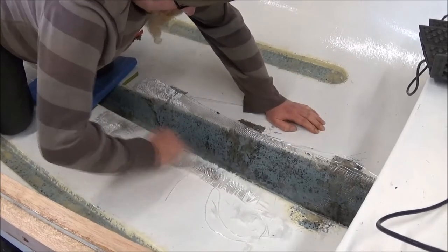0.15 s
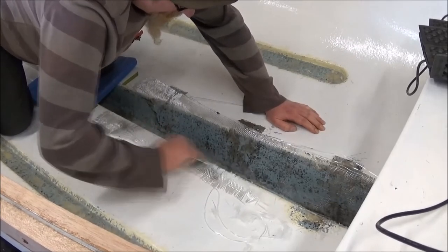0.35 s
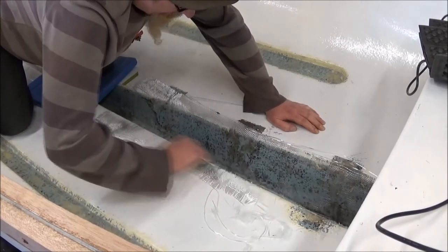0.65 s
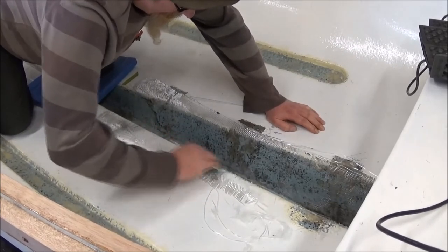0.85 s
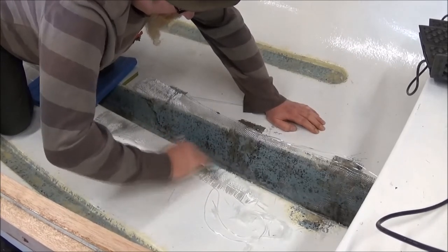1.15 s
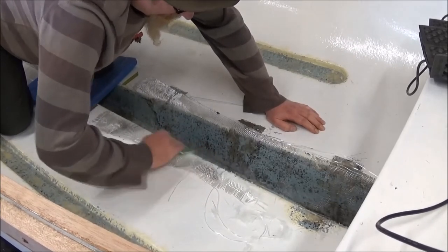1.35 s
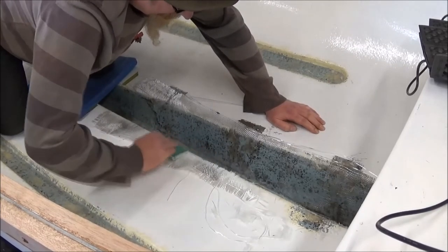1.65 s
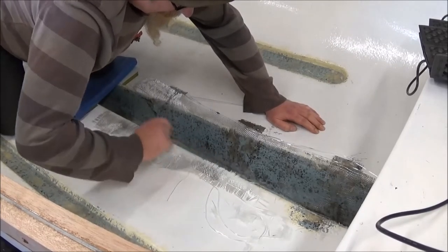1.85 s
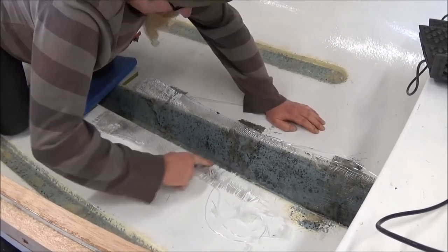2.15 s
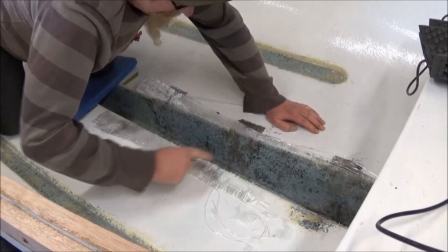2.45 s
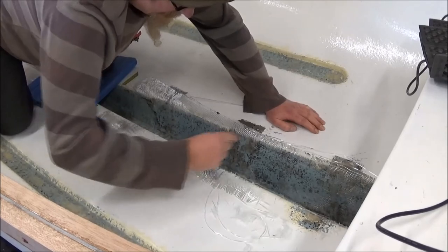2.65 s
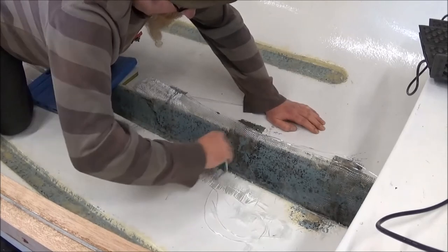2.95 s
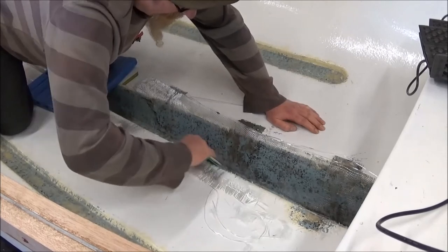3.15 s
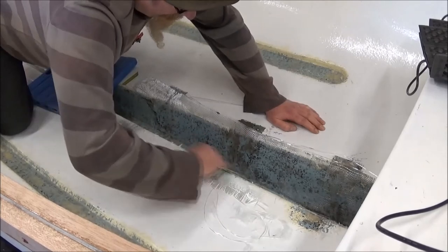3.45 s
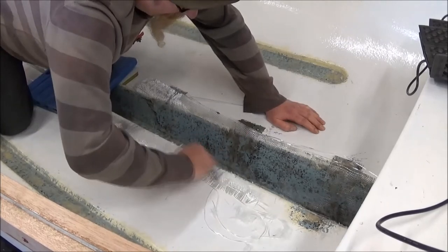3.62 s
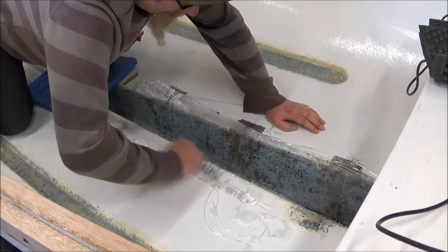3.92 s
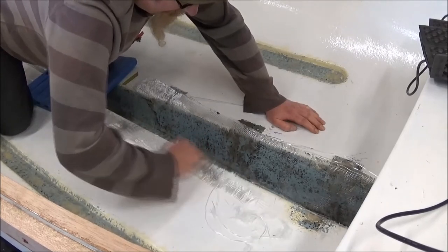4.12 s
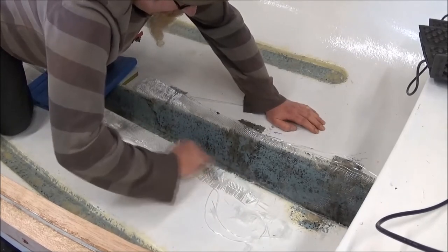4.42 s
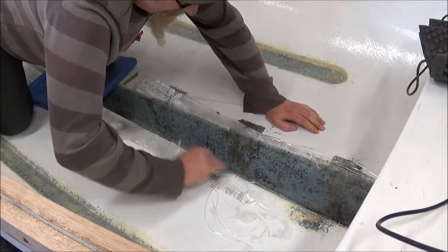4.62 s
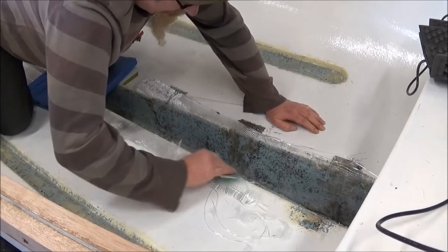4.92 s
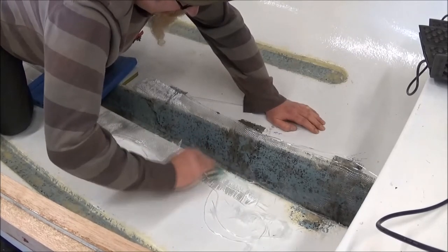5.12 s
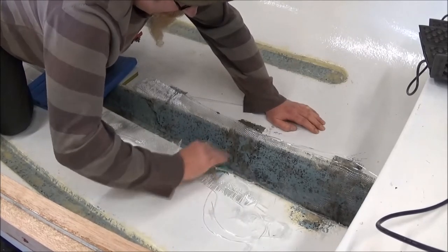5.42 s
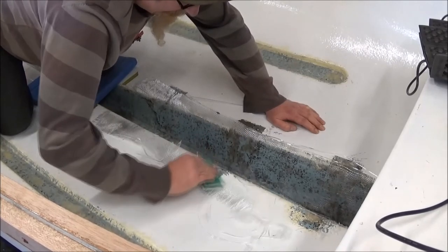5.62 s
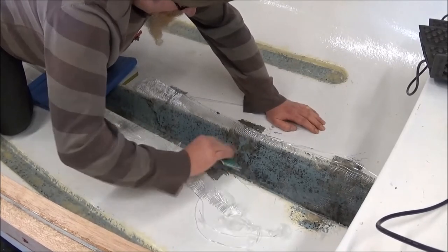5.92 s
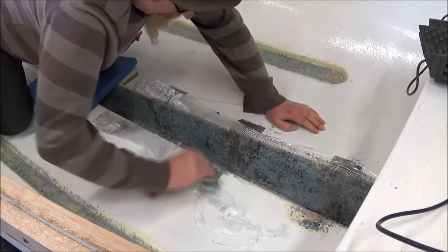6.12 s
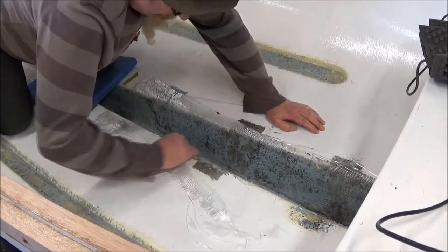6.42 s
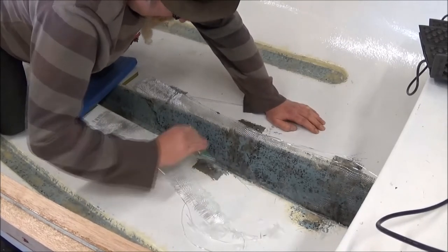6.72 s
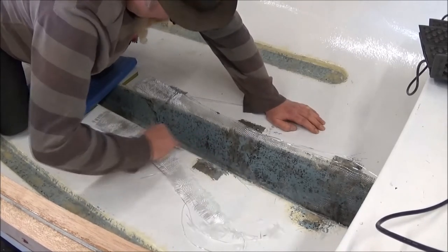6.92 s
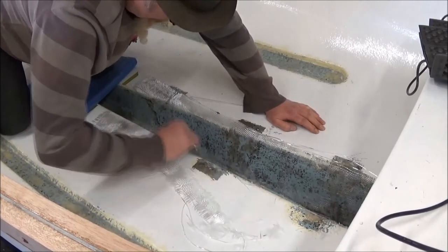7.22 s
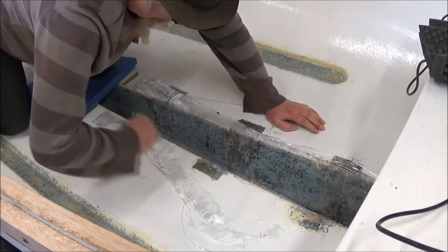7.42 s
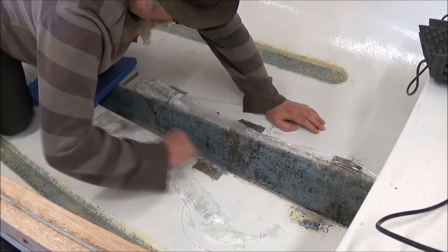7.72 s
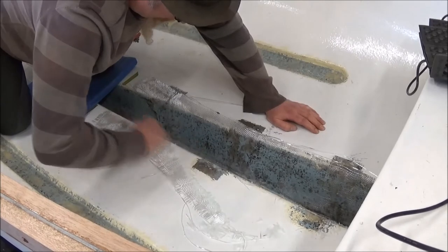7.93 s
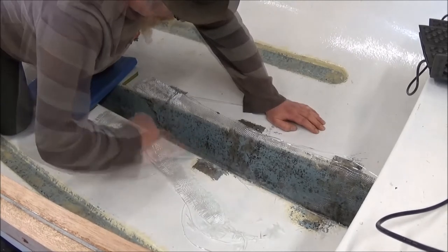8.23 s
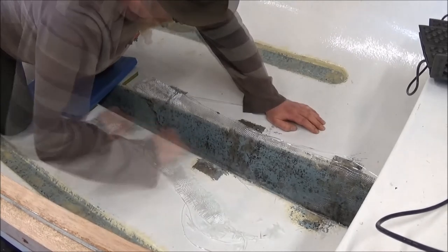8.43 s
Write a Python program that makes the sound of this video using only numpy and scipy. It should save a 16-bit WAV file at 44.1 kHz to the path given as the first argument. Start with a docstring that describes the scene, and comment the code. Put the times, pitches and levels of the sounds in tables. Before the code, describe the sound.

Close and centred in a workshop, a hand sanding block scrubs resin inside a fibreglass hull in rapid, hissing strokes. After a short lull with gentle wiping, crisp paper snaps and a dull bump, the scrubbing returns. Later the strokes become spaced out, the block landing with light thuds, before a last run of quieter rubs. Short room reflections and a faint ventilation hum lie behind the work.

```python
"""A sanding block, pushed back and forth by hand over hard resin inside a fibreglass boat hull.
Each stroke is a hiss of grit that also rattles the block and drums the hull panel. In a pause hand or
paper wipes lightly, the paper is flicked about and the hull takes a knock; later the block is lifted
and set down between strokes. Workshop reflections and quiet ventilation give the width."""
import sys
import numpy as np
from scipy import signal
from scipy.fft import rfft, irfft, next_fast_len
from scipy.io import wavfile
from scipy.ndimage import uniform_filter1d, map_coordinates

SR = 44100
rng = np.random.default_rng(int(sys.argv[2]) if len(sys.argv) > 2 else 0)


def to_wav(s):
    """Save 16-bit WAV."""
    ch = np.atleast_2d(s).T  # columns
    pcm = np.round(np.clip(ch, -1, 1) * 32767)  # PCM
    wavfile.write(sys.argv[1], SR, pcm.astype(np.int16))


N = 377937

# Workshop air. Each row: frequency in Hz, relative spectral level in dB.
AIR_SPECTRUM = [(20, -4), (60, 3), (130, 3.5), (210, 3.5), (320, -4.5), (700, -3.5), (1100, -4.5),
                (1400, -7), (1680, -4.5), (2050, -10.5), (5000, -18), (9500, -16.5), (15500, -30)]
# Background swell. Each row: time in seconds, gain in dB.
AIR_GAIN = [(0, 3), (1.5, 7.5), (2.3, 1.5), (3.5, 8.5), (5.9, 3), (7.3, -3.5), (8.57, -4.5)]
# Workshop reverberation. Each row: frequency in Hz, T60 in seconds.
ROOM_T60 = [(100, 0.28), (400, 0.35), (1500, 0.31), (4000, 0.32), (9000, 0.23), (15000, 0.16)]
# Stereo width. Each row: frequency in Hz, side gain in dB.
SIDE_GAIN = [(50, -29), (130, -23.5), (250, -16), (500, -10.5), (1100, -6), (2500, -7), (8000, -5),
             (9500, -9.5), (11000, -15), (13000, -39)]
# Hull panel resonances. Each row: frequency in Hz, bandwidth in Hz, relative level in dB.
HULL_MODES = [(60, 8.3, -13), (98.4, 3.9, -2), (165, 37, -10.5), (203.4, 17.4, 2), (227, 22, 1),
              (272, 35, 1), (326.5, 64, 1), (378.6, 84, 2.5), (461, 135, -5), (535.8, 23, 1),
              (638, 185, -10.5)]
# Block resonances. Each row: frequency in Hz, bandwidth in Hz, relative level in dB.
BLOCK_MODES = [(824, 290, 0.21), (1072, 64, 18.7), (1167, 82, 14.4), (1335, 88, 20.3), (1515, 96, 12.5),
               (1678, 80, 19.8), (2030, 580, 0.86), (2710, 92, 1.4)]
# A knee or the block lands on the hull, or the block judders. Each row: start in seconds,
# level in dB, judder decay in seconds, hardness in Hz, ringing share from 0 to 1.
HULL_THUMPS = [(0.35, -34.5, 0.026, 326, 0.8), (1.03, -41.5, 0.022, 115, 1), (1.15, -36, 0.017, 300, 0.78),
               (2.062, -43, 0.0066, 140, 0.1), (2.073, -39, 0.0072, 239, 0.63),
               (2.1, -38.5, 0.0057, 96, 0.8), (2.952, -52, 0.02, 218, 0.6), (5.465, -38.5, 0.022, 75, 0.16),
               (6.042, -35, 0.02, 85.5, .08), (6.411, -36, 0.039, 240, 0.26), (6.898, -51, 0.014, 190, 0.3),
               (7.286, -42, 0.018, 230, 0.15), (7.29, -47.5, 0.014, 62, 0.05),
               (7.683, -50, 0.025, 213, 0.4)]
# Stiff paper snaps, scuffs or touches down. Each row: time in seconds, level in dB, decay in seconds.
PAPER_FLICKS = [(0.954, -27, 0.0049), (1.782, -31, 0.0057), (1.881, -35, 0.021), (2.064, -41, 0.027),
                (2.234, -41.5, 0.012), (2.692, -46, 0.01), (2.755, -35.5, 0.016), (2.829, -34.5, 0.0061),
                (2.9, -33.5, 0.013), (3.036, -34.5, 0.011), (4.987, -38, 0.012), (5.418, -45, 0.039),
                (5.471, -44, 0.0035), (5.488, -42, 0.007), (5.872, -47.5, 0.014), (6.02, -44, 0.015),
                (6.035, -35, 0.016), (6.39, -37, 0.012), (6.408, -28.5, 0.025), (6.887, -36, 0.012),
                (6.9, -27.5, 0.015), (7.282, -41, 0.015), (7.298, -28.5, 0.016), (7.68, -34, 0.025)]
# Grit hiss. Each row: frequency in Hz, relative spectral level in dB.
HISS_SPECTRUM = [(1000, 1.5), (3500, -8), (4500, -7), (5400, -4), (7200, -2.5), (8400, 0), (9400, 4.5),
                 (10100, 2), (11000, -1), (12200, -5.5), (13500, -10.5), (15800, -16)]
# Gap under the paper as the grip shifts. Each row: time in seconds, lower hiss edge in Hz, rasp in Hz.
PAPER_GAP = [(0, 3030, 4140), (.7, 3000, 4050), (1.1, 2930, 3400), (1.4, 2780, 4000), (2.5, 2850, 3400),
             (3.25, 3100, 4760), (3.42, 3150, 4420), (3.77, 2980, 3430), (4.22, 2770, 3550),
             (4.4, 2580, 2960), (4.95, 2700, 5600), (6.05, 2820, 5530), (6.42, 2870, 3370),
             (7.27, 2800, 4160), (7.7, 3000, 4300), (7.9, 2940, 4250), (8.5, 2650, 3600)]
# Slacker spots of the hull sound deeper. Each row: time in seconds, bass tilt in dB per octave.
HULL_SLACK = [(0, 1), (.8, -1.5), (1.5, 0.5), (3.1, -0.5), (3.8, 2.5), (5.2, 2), (6.5, -2.5), (7.6, -0.5),
              (8.5, 1)]
# Hull drumming, highest while the paper barely bites. Each row: time in seconds, gain in dB.
DRUM_GAIN = [(0, 0), (.63, -1.5), (1.1, 5), (1.53, -3), (1.7, 7.5), (2.2, 10), (2.68, 0), (2.9, 16),
             (3.1, -5), (4.3, 0), (5.1, 1.5), (5.45, 9.5), (5.6, -4.5), (6.9, -5), (7.7, -5), (8.5, -2)]
# Block scrape. Each row: time in seconds, gain in dB.
SCRAPE_GAIN = [(0, -0.5), (1.1, 2.5), (1.53, -1), (1.7, 8.5), (2.2, 13.5), (2.68, -16), (2.9, 4), (3.25, 1),
               (3.8, -1.5), (4.4, -3), (5, -0.5), (5.5, 2.5), (6.9, 3), (7.7, 1), (8.5, 0.5)]
# Sanding strokes, forth or back, and light wipes of hand or paper in the pause.
# Each row: start in seconds, end in seconds, hiss level in dB, pressure change over the rub in dB,
# brightness in dB per octave.
RUBS = [(-0.036, 0.126, -24, -17.5, -1.3), (0.092, 0.311, -23.5, 5.5, -1.5), (0.283, 0.46, -23, 0.5, -1.5),
        (0.458, 0.636, -23.5, -5.5, -1.7), (0.626, 0.795, -22, -1.0, -0.9), (0.766, 0.96, -23.5, -3, -0.8),
        (0.939, 1.1, -23.5, 2, -1), (1.085, 1.256, -24, -6, 0.8), (1.239, 1.394, -23.5, 7, -0.5),
        (1.383, 1.534, -23.5, 1, 0.8), (1.54, 1.688, -23.5, 7.5, 0.6), (1.664, 1.867, -34.5, -3.5, -2.3),
        (1.845, 2.06, -49, -11, 0.5), (2.16, 2.437, -48.0, -2, 0.7), (2.446, 2.527, -56.5, -20, 0),
        (2.506, 2.584, -43.5, 0, -0.5), (2.679, 2.744, -38.5, 15, -1), (2.905, 3.04, -45, -6, 0.5),
        (3.016, 3.137, -37, 3, -2.5), (3.096, 3.267, -25.5, -9, 0.5), (3.254, 3.439, -25, -11.5, -2.8),
        (3.415, 3.609, -24, -3.5, -2.8), (3.605, 3.767, -25, 4, -4), (3.77, 3.939, -23, -0.5, -2.2),
        (3.933, 4.081, -23.5, 10, -3.5), (4.079, 4.243, -23.5, 1.0, -3.5), (4.227, 4.384, -23.5, -2, -4.5),
        (4.38, 4.52, -24.5, -1.5, -4), (4.51, 4.644, -25, 0, -2.5), (4.634, 4.762, -24, -0.5, -1.3),
        (4.76, 4.926, -25, -2, -1), (4.963, 5.104, -28.5, 19, -1.1), (5.106, 5.282, -26, 0, -0.5),
        (5.448, 5.622, -33.5, 7.5, -4.5), (5.582, 5.722, -27.5, 9.0, -3), (6.044, 6.256, -26.5, -1, -3.0),
        (6.419, 6.602, -29.5, 13.5, -4), (6.865, 7.123, -30, 6, 0.4), (7.267, 7.528, -31, 3.5, -0.5),
        (7.484, 7.581, -38, -12, 0.2), (7.701, 7.95, -33, -1, -0.7), (7.898, 8.12, -35, -5, 0.5),
        (8.082, 8.285, -35, -1, -0.2), (8.254, 8.457, -36.5, -1.5, -1), (8.398, 8.642, -37, 5.5, 0.5)]


def amp(db):
    """dB to gain."""
    return 10 ** (np.asarray(db) / 20)


def unit_rms(x):
    """Scale to rms 1."""
    return x / np.sqrt(np.mean(x ** 2) + 1e-20)


def at_hz(table, hz):
    """Interpolate a table over log frequency."""
    f, value = np.transpose(table)
    return np.interp(np.log(hz + 1), np.log(f + 1), value)


def at_time(table, time_s):
    """Interpolate each value column over time."""
    times, *columns = np.transpose(table)
    return [np.interp(time_s, times, column) for column in columns]


def add(mix, start_s, sound):
    """Mix in at start_s, cutting any overhang."""
    at = round(start_s * SR)
    sound = sound[max(-at, 0):]
    part = mix[max(at, 0):][:len(sound)]
    part += sound[:len(part)]


def colour(x, gain):
    """Filter by gain(frequency in Hz)."""
    size = next_fast_len(x.shape[-1] + 2048)
    return irfft(rfft(x, size) * gain(np.fft.rfftfreq(size, 1 / SR)), size)[..., :x.shape[-1]]


def wander(size, rate_hz):
    """Random drift of rms 1, rolling off above rate_hz."""
    return unit_rms(colour(rng.standard_normal(size), lambda f: 1 / (1 + (f / rate_hz) ** 2)))


def ring(force, modes, detune, spot_db):
    """Damped modes of alternating sign; each contact spot loads and feeds them differently."""
    t = np.arange(SR // 4) / SR
    spots = rng.standard_normal((len(modes), 2))
    response = np.zeros(len(t))
    for k, ((hz, width_hz, db), (feed, load)) in enumerate(zip(modes, spots)):
        envelope = amp(db + spot_db * feed) * width_hz * np.exp(-np.pi * width_hz * t)
        response += (-1) ** k * envelope * np.cos(2 * np.pi * hz * (1 + detune * load) * t)
    return signal.fftconvolve(force, response / np.linalg.norm(response))


def ventilation(air_db=-58.5, hum_hz=198.7, hum_db=-66.5, waver_db=2):
    """Quiet air rumble with a wavering hum, as mid and side."""
    noise = colour(rng.standard_normal((2, N)), lambda f: amp(at_hz(AIR_SPECTRUM, f)))
    mid, side = amp(air_db) * unit_rms(noise)
    pitch_hz = hum_hz + 2.29 * wander(N, rate_hz=4.9)
    hum = np.sqrt(2) * np.sin(2 * np.pi * np.cumsum(pitch_hz) / SR)
    hum *= amp(hum_db + waver_db * wander(N, rate_hz=4))
    swell = amp(at_time(AIR_GAIN, np.arange(N) / SR)[0])
    return swell * np.array([mid + hum, side])


def room(x, first_s=0.0049, build_s=0.019):
    """Dense reflections off hull and walls, as mid and side; each band has its own decay."""
    hz, t, noise = signal.stft(rng.standard_normal((2, SR)), SR, nperseg=256)
    tail = signal.istft(noise * amp(-60 * t / at_hz(ROOM_T60, hz)[:, None]), SR)[1]
    tail *= 1 - np.exp(-np.maximum(np.arange(tail.shape[1]) / SR - first_s, 0) / build_s)
    return signal.fftconvolve(x[None], tail / np.linalg.norm(tail[0]), axes=1)[:, :N]


def moving_room(x, count=3, cycles_per_s=1.3):
    """The moving hand and arm change the reflections: a crossfade of room responses."""
    place = np.arange(N) / SR * cycles_per_s * count
    nearness = [np.maximum(1 - abs((place - k) % count - count / 2), 0) for k in range(count)]
    return sum(room(x * np.sin(np.pi / 2 * near)) for near in nearness)


def hull_glance(x, delay_s=0.0016, drift_s=0.000486):
    """One reflection off the glossy hull beside the block; its path moves with the hand."""
    path_s = delay_s + drift_s * wander(N, rate_hz=1)
    return map_coordinates(x, [np.arange(N) - SR * path_s], order=3)


def thumps(firm_s=0.014, low_cut_hz=45):
    """Short thumps are mostly one firm push, long ones judder; part thuds, part rings in the hull."""
    out, t = np.zeros(N), np.arange(SR // 3) / SR
    for start_s, db, decay_s, hard_hz, ringing in HULL_THUMPS:
        firm = np.exp(-decay_s / firm_s)
        phase = np.pi * (hard_hz * t - 1)
        push = unit_rms((1 - 2 * phase ** 2) * np.exp(-phase ** 2))
        noise = colour(rng.standard_normal(len(t)), lambda f: f / hard_hz / (1 + (f / hard_hz) ** 4))
        judder = unit_rms(noise * t * np.exp(-t / decay_s))
        force = unit_rms(firm * push + (1 - firm) * judder)
        panel = unit_rms(ring(force, HULL_MODES, detune=0.005, spot_db=-0.5)[:len(t)])
        thud = unit_rms(ringing * panel + (1 - ringing) * force)
        add(out, start_s, amp(db) * thud * np.sqrt(0.05 / t[-1]))  # level: energy spread over 50 ms
    return colour(out, lambda f: 1 / np.sqrt(1 + (low_cut_hz / (f + 1)) ** 10))


def hull_drum(friction, grains, slack_db_per_oct, lump_db=-2.5):
    """The slow part of the drag drives the hull panel, in lumps."""
    drag = colour(grains, lambda f: amp(-slack_db_per_oct * np.log2(np.clip(f, 60, 900) / 300)))
    drag *= amp(lump_db * wander(len(grains), rate_hz=40))
    return ring(friction * drag, HULL_MODES, detune=0.02, spot_db=1.5)


def block_scrape(force, resin_db=7, low_cut_hz=650):
    """The block rings with the grit; the resin under it adds an unpitched scratch."""
    scratch = colour(force, lambda f: 1 / np.sqrt(1 + (low_cut_hz / (f + 1)) ** 4))
    out = ring(force, BLOCK_MODES, detune=0.012, spot_db=2)
    out[:len(scratch)] += amp(resin_db) * scratch
    return out


def grit(speed, base_rate_hz=22000, spread_db=3, chatter_db=0.13, dust_gain=0.78):
    """Grains catch and let go, more often at speed; the block chatters over the uneven weave."""
    size = len(speed)
    caught = rng.random(size) < base_rate_hz / SR * (0.15 + speed)
    coarseness = np.minimum(rng.exponential(1, size), 4)
    clicks = unit_rms(caught * amp(spread_db * coarseness) * rng.choice([-1, 1], size))
    grains = clicks + dust_gain * rng.standard_normal(size)
    return unit_rms(grains * amp(chatter_db * wander(size, rate_hz=130)))


def paper_hiss(grains, edge_hz, rasp_hz, bright_db_per_oct, touch_db,
               rasp_db=3, ripple_db=0.7, firm_touch_db=-25.5, loose_cut_db=3):
    """The gap under the paper radiates above edge_hz and rasps at one resonance."""
    grip_ripple = np.column_stack([np.linspace(2000, 16000, num=14), rng.standard_normal(14)])
    # Under a light touch the paper lies loose and its treble peak fades.
    loose = np.clip((firm_touch_db - touch_db) / 20, 0, 1)

    def gain(f):
        octaves = np.log2(np.minimum(f + 1, 11500) / 7000)
        rasp = np.exp(-((f / rasp_hz - 1) / 0.074) ** 2)
        treble_peak = np.exp(-((f - 9700) / 1600) ** 2)
        shape_db = at_hz(HISS_SPECTRUM, f) + bright_db_per_oct * octaves + rasp_db * rasp
        shape_db += ripple_db * at_hz(grip_ripple, f) - loose * loose_cut_db * treble_peak
        return amp(shape_db) / np.sqrt(1 + (edge_hz / (f + 1)) ** 16)
    return unit_rms(colour(grains, gain))


def flicks(rise_s=0.0021, tap_db=-19, tap_top_hz=3000):
    """Short bursts of grit as the paper's edge catches; each also taps the block."""
    hiss, taps = np.zeros((2, N))
    t = np.arange(-SR // 50, SR // 10) / SR
    for time_s, db, decay_s in PAPER_FLICKS:
        touch = 1 / (np.exp(-t / rise_s) + np.exp(t / decay_s))
        grains = grit(touch)
        burst = paper_hiss(grains, *at_time(PAPER_GAP, time_s), bright_db_per_oct=0, touch_db=db)
        add(hiss, time_s + t[0], amp(db) * touch * burst)
        add(taps, time_s + t[0], block_scrape(amp(db + tap_db) * touch * grains))
    return hiss + colour(taps, lambda f: 1 / np.sqrt(1 + (f / tap_top_hz) ** 6))


def rocking(hiss, depth_db=1.97):
    """The block rocks as it slides, so patches of the hiss come and go."""
    spectra = signal.stft(hiss, nperseg=512)[2]
    patches = uniform_filter1d(rng.standard_normal(spectra.shape), size=7, axis=0)
    patches = unit_rms(uniform_filter1d(patches, size=5, axis=1))
    return signal.istft(spectra * amp(depth_db * patches))[1][:N]


def sanding(speeding_share=0.23, slowing_share=0.4, unsteady_db=0.78, settle_db_per_s=14):
    """Each stroke or wipe speeds up, glides and stops; its friction drives paper, block and hull."""
    hiss, body = np.zeros((2, N))
    for start_s, end_s, db, lean_db, bright_db_per_oct in RUBS:
        along = np.linspace(0, 1, num=round((end_s - start_s) * SR))
        speeding = np.sin(np.pi / 2 * np.minimum(along / speeding_share, 1))
        slowing = np.sin(np.pi / 2 * np.minimum((1 - along) / slowing_share, 1)) ** 2
        speed = speeding * slowing
        unsteady = unit_rms(amp(unsteady_db * wander(len(along), rate_hz=22)))
        friction = speed * amp(db + lean_db * (along - 0.5)) * unsteady
        grains = grit(speed)
        edge_hz, rasp_hz = at_time(PAPER_GAP, start_s)
        add(hiss, start_s, friction * paper_hiss(grains, edge_hz, rasp_hz, bright_db_per_oct, db))
        # A dull rub lies flatter and shakes block and hull more.
        scrape_db = -23.5 - 0.94 * bright_db_per_oct + at_time(SCRAPE_GAIN, start_s)[0]
        drum_db = -21.5 - 0.36 * bright_db_per_oct + at_time(DRUM_GAIN, start_s)[0]
        # The block settles flat along a stroke, so its scrape grows.
        settling_db = settle_db_per_s * (end_s - start_s) * (along - 0.5)
        add(body, start_s, block_scrape(amp(scrape_db + settling_db) * friction * grains))
        add(body, start_s, amp(drum_db) * hull_drum(friction, grains, *at_time(HULL_SLACK, start_s)))
    # Band of 80-3000 Hz; the drumming carries little below 80 Hz.
    body = colour(body, lambda f: 1 / np.sqrt((1 + (f / 3000) ** 6) * (1 + (80 / (f + 1)) ** 6)))
    return rocking(hiss), body


def scene(hiss_wet_db=-10, body_wet_db=-3, thump_wet_db=-9, glance_db=-13):
    """The work is straight ahead; reflections and room air give the width."""
    hiss, body = sanding()
    hiss = hiss + flicks()
    knocks = thumps()
    send = amp(hiss_wet_db) * hiss + amp(body_wet_db) * body + amp(thump_wet_db) * knocks
    echo_mid, echo_side = moving_room(send)
    air_mid, air_side = ventilation()
    mid = hiss + body + knocks + echo_mid + air_mid
    glance = amp(glance_db) * hull_glance(hiss + body)
    side = colour(echo_side + glance + air_side, lambda f: amp(at_hz(SIDE_GAIN, f)))
    return np.array([mid + side, mid - side])


def record(dry):
    """Steep low-pass at 15.9 kHz."""
    low_pass = signal.firwin(511, 15900, window=("kaiser", 9), fs=SR)
    return signal.oaconvolve(dry, low_pass[None], "same")


dry = scene()
out = record(dry)
to_wav(out)
```